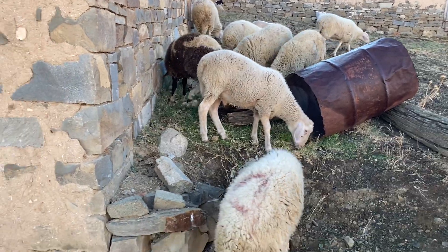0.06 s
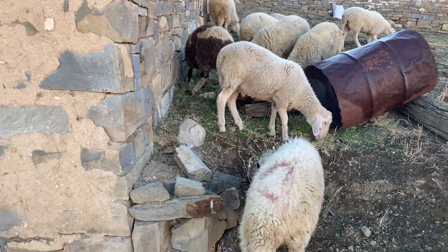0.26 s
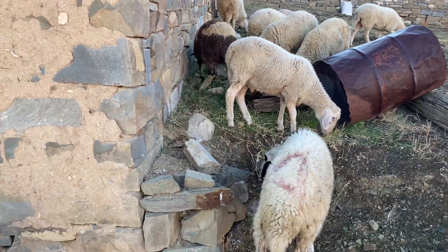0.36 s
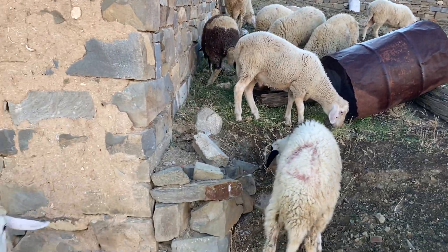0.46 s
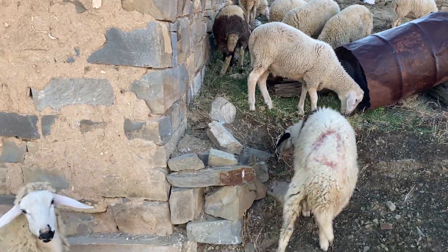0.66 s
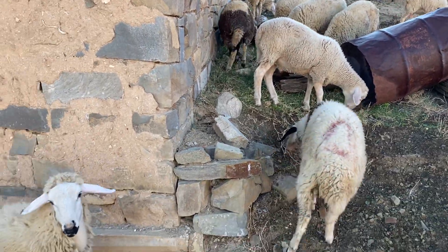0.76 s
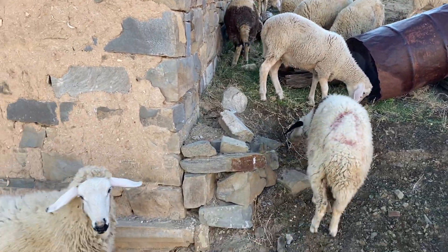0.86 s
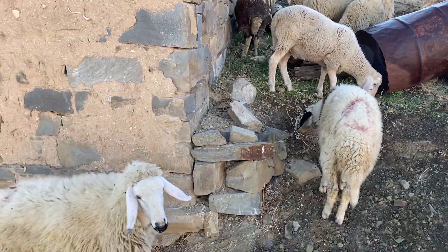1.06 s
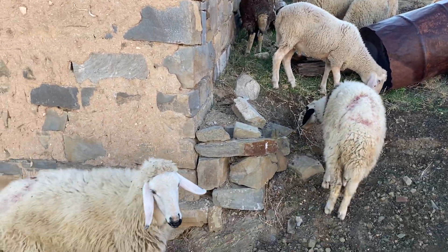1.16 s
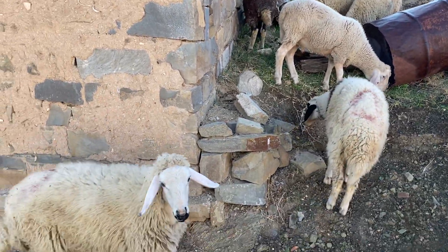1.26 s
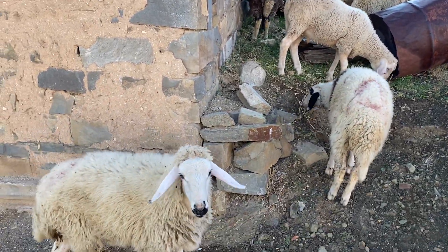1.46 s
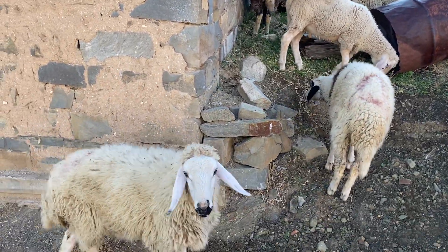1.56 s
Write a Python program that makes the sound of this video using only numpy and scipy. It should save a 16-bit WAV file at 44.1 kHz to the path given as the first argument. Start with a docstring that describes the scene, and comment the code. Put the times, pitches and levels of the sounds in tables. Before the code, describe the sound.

A small sheep bell clonks unevenly close by, with light hoof scuffs and faint wind.

```python
"""A small sheet-metal bell clonks unevenly on a sheep walking close by on the left.
Each clapper strike chokes the last hum and starts a new one, with bright rings on top.
Hooves tick and scuff on stony ground, dry grass crackles and a small metal link chinks.
Behind them light wind rumbles on the microphone, with one short buffet that flaps and crackles."""
import sys
import numpy as np
from scipy import signal
from scipy.fft import rfft, irfft
from scipy.io import wavfile
from scipy.ndimage import uniform_filter1d

SR = 44100
rng = np.random.default_rng(int(sys.argv[2]) if len(sys.argv) > 2 else 0)


def int16_out(signal):
    """Quantize to a 16-bit WAV file."""
    q = np.round(np.clip(np.atleast_2d(signal).T, -1, 1) * 32767)
    wavfile.write(sys.argv[1], SR, q.astype(np.int16))


N = 70560
T = np.arange(N) / SR
FREQS = np.fft.rfftfreq(N, 1 / SR) + 1e-3
LEFT_RIGHT = np.array([[.5], [-.5]])  # splits a level or phase offset between the sides


def undb(db):
    """Decibels to gain."""
    return 10 ** (np.asarray(db) / 20)


def unit(x):
    """Scale to rms 1."""
    return x / np.sqrt(np.mean(x ** 2) + 1e-24)


def fader(points):
    """Gain ride through (time [s], level [dB]) points."""
    return undb(np.interp(T, *np.array(points).T))


def colour(x, points):
    """EQ x through (frequency [Hz], gain [dB]) points, then scale to rms 1."""
    hz, db = np.array(points).T
    gain = undb(np.interp(np.log(FREQS), np.log(hz), db))
    return unit(irfft(rfft(x) * gain, N))


def noise(side_db):
    """Stereo white noise, mostly shared by both sides."""
    mid, side = rng.standard_normal((2, N))
    return mid + undb(side_db) * side * np.array([[1], [-1]])


def band(hz, width_hz):
    """Stereo noise in one steep-sided resonance."""
    detune = (FREQS - hz ** 2 / FREQS) / width_hz
    return unit(irfft(rfft(noise(side_db=-12)) / np.sqrt(1 + detune ** 4), N))


def steady(x, window_s):
    """Even out the chance swells of a low noise."""
    power = uniform_filter1d(np.mean(x ** 2, axis=0), max(int(window_s * SR), 8))
    return x / np.sqrt(power + 0.1)


def wander(rate_hz):
    """Glide between random values."""
    knots = rng.standard_normal(size=400)
    return np.interp(T * rate_hz, np.arange(len(knots)), knots)


def since(start):
    """Seconds since start, zero before it."""
    return np.maximum(T - start, 0)


def burst(start, decay_s, rise_s=.0002):
    """Near-instant attack and exponential release."""
    age = since(start)
    return (1 - np.exp(-age / rise_s)) * np.exp(-np.minimum(age / decay_s, 50))


def struck(modes, start, lag_ms, sustain=1, rise_s=.0021):
    """Decaying metal modes of alternating sign, so a close pair swells and beats; the right side lags."""
    live = (T > start) & (T < start + .6)
    age = np.maximum(T[live] - start - np.array([[0], [lag_ms / 1000]]), 0)
    out = np.zeros((2, N))
    for k, (hz, db, t60, pan_db) in enumerate(modes):
        gain = (-1) ** k * undb(db + LEFT_RIGHT * pan_db)
        tail = np.exp(-np.log(1000) * age / (t60 * sustain))
        out[:, live] += gain * np.sin(2 * np.pi * hz * age) * tail
    return out * (1 - np.exp(-since(start) / rise_s))


# Swell of the breeze (time [s], level [dB])
WIND_LEVEL = [(0, -53), (.17, -54), (.222, -44.5), (.25, -35), (.335, -29.5), (.355, -51), (.41, -48.5),
              (.458, -62), (.538, -51.5), (.6, -66), (1.05, -69.5), (1.6, -73.5)]
# Bass-heavy wind tone (frequency [Hz], gain [dB])
WIND_EQ = [(20, -30), (36, -14), (50, -15), (67, 0), (86, -2), (105, -7), (125, -16), (160, -24),
           (300, -47), (800, -78)]
def wind():
    """Air on the microphone: a low rumble that swells into one buffet."""
    rumble = colour(noise(side_db=-17), WIND_EQ)
    return steady(rumble, window_s=0.043) * fader(WIND_LEVEL)


# Flaps in the buffet (time [s], level [dB], start pitch [Hz], end pitch [Hz], length [s])
EDDY_FLAPS = [(0.119, -55, 145, 125, 0.059), (0.2, -51.5, 200, 172, 0.029), (0.237, -41, 190, 139, 0.036),
              (0.285, -34, 235, 155, 0.02), (0.314, -38, 329.3, 102, 0.0199)]
def eddies(skew_rad=0.56):
    """Short rounded flaps of air fall in pitch and reach the two sides a little out of step."""
    out = 0
    for start, db, start_hz, end_hz, length in EDDY_FLAPS:
        progress = np.clip((T - start) / length, 0, 1)
        pitch = start_hz + (end_hz - start_hz) * progress
        phase = 2 * np.pi * (np.cumsum(pitch) / SR + rng.random())
        swell = np.sin(np.pi * progress) ** 2
        out += undb(db) * np.sqrt(2) * swell * np.sin(phase + skew_rad * LEFT_RIGHT)
    return out


# Movement of the flock (time [s], level [dB])
SHUFFLE_LEVEL = [(0, -71.5), (.42, -65.5), (.55, -62.5), (.9, -63), (1.3, -67), (1.6, -75.5)]
# Dull shuffle tone (frequency [Hz], gain [dB])
SHUFFLE_EQ = [(60, 4.5), (130, 3), (230, 1), (360, -2.5), (520, -13), (1000, -19.5), (3000, -40)]
def flock_shuffle():
    """The moving flock lays down a soft, low bed of noise."""
    return colour(noise(side_db=-9), SHUFFLE_EQ) * fader(SHUFFLE_LEVEL)


# Rustle under the flock (time [s], level [dB])
GRASS_LEVEL = [(0, -72.5), (.056, -74), (.13, -73.5), (.175, -68), (.22, -76.5), (.265, -69), (.295, -65.5),
               (.44, -63), (.56, -66), (.68, -66.5), (.77, -62.5), (.82, -65.5), (.935, -60), (.965, -57.5),
               (1.05, -64), (1.1, -72), (1.26, -67), (1.31, -71), (1.39, -68.5), (1.47, -61), (1.53, -67),
               (1.6, -67)]
# Broad, dry grass tone (frequency [Hz], gain [dB])
GRASS_EQ = [(200, -5.5), (500, 5.5), (900, 3), (1600, 0), (3000, -2), (5500, -2.5), (7300, 0), (11500, 0),
            (16000, 0.5)]
def dry_grass(grains_per_s=590, spread_db=9.5, flicker_db=2.5):
    """Trodden grass gives a flickering hiss, peppered with fine crackle."""
    grains = (rng.random(N) < grains_per_s / SR) * rng.choice([-1, 1], N)
    accents = undb(spread_db * np.minimum(rng.exponential(size=N), 3))
    crackle = undb(-8.5) * unit(grains * accents)
    rustle = colour(noise(side_db=-13) + crackle, GRASS_EQ)
    return rustle * fader(GRASS_LEVEL) * undb(flicker_db * wander(rate_hz=69.58))


# Thin modes of the link (frequency [Hz], level [dB], t60 [s], left minus right [dB])
LINK_MODES = [(4748, 0, .14, 0), (7698, 1, .07, 0), (11640, -2, .07, 0)]
# Taps on the link (time [s], level [dB])
LINK_TAPS = [(1.249, -70), (1.2729, -63), (1.3585, -69.5)]
def metal_link():
    """A small piece of metal chinks faintly."""
    return sum(undb(db) * struck(LINK_MODES, start, lag_ms=0) for start, db in LINK_TAPS)


# Buffet crackle, then hoof hits (time [s], level [dB], centre [Hz], width [Hz], decay [s])
SHARP_TICKS = [(0.274, -49.5, 4800, 6400, .0011), (0.273, -49.5, 900, 1180, 0.0016),
               (0.2904, -57.5, 2000, 3600, 0.012), (0.315, -54.5, 2700, 5900, 0.003),
               (0.534, -53, 8350, 8800, 0.0013), (0.826, -60, 3830, 7060, 0.0044),
               (.862, -53, 2700, 4800, 0.0053), (0.9034, -53.5, 4760, 14200, 0.0026),
               (.9029, -55.5, 970, 1500, .0053), (.922, -52, 11100, 9000, .0012),
               (.9403, -55, 4860, 9100, 0.00063), (1.222, -54, 6000, 13500, 0.0048),
               (1.232, -48.5, 8700, 12000, 0.0014), (1.249, -53, 5450, 8400, .0019),
               (1.274, -54, 7750, 8000, 0.0023), (1.311, -62.5, 1970, 890, 0.0037),
               (1.332, -55.5, 1380, 1100, 0.0023), (1.344, -65, 1900, 700, .0025),
               (1.359, -66.5, 1600, 1400, 0.0043), (1.400, -63.5, 1840, 700, 0.0051),
               (1.412, -60, 885, 885, 0.0064), (1.433, -39, 10500, 8050, 0.002),
               (1.434, -52, 1220, 2600, 0.0027), (1.452, -39, 9500, 8000, 0.00059),
               (1.4517, -45, 1090, 2590, 0.0012), (1.566, -58.5, 6650, 6060, 0.0071),
               (1.583, -59, 4200, 2990, 0.0044), (1.591, -59.5, 5000, 6000, 0.0086)]
def sharp_ticks():
    """Sharp snaps of noise: crackle in the wind buffet, then hooves on grit and stalks."""
    return sum(undb(db) * burst(start, decay) * band(hz, width)
               for start, db, hz, width, decay in SHARP_TICKS)


# Buffet rasp, then hoof scuffs (time [s], level [dB], centre [Hz], width [Hz], length [s])
NOISE_PUFFS = [(.275, -58.5, 694, 940, 0.066), (.548, -62, 487, 200, 0.023), (1.105, -59, 218, 58, 0.036),
               (1.218, -63.5, 565, 200, 0.028), (1.44, -62, 260, 256, 0.024),
               (1.44, -63.5, 743, 307, 0.088)]
def noise_puffs():
    """Dull, rounded puffs: one rasp in the wind buffet, then hooves rubbing the earth."""
    out = 0
    for start, db, hz, width, length in NOISE_PUFFS:
        swell = np.sin(np.pi * np.clip((T - start) / length, 0, 1))
        out += undb(db) * steady(band(hz, width), window_s=0.018) * swell
    return out


# The bell's hollow hum, long ring and bright clink, each as modes
# (frequency [Hz], level [dB], t60 [s], left minus right [dB])
HUM_MODES = [(1159, 0, .14, -1.4), (1109, 0, .045, -1.4), (1560, -24, .1, 0), (6223, -44, .2, 3)]
RING_MODES = [(3090.5, 0, .35, 4), (6226, -16, .3, 3)]
CLINK_MODES = [(3370, -1, 0.24, 5.8), (3328, -4, 0.033, 2.1)]
# Clapper hits (time [s], hum [dB], ring [dB], clink [dB], sustain of hum and ring [x t60])
CLAPPER_HITS = [(-.045, -39, -52.5, -56, 1.25), (0.1434, -40.5, -64.5, -50.5, 0.9),
                (0.158, -44.5, -73.5, -98, 0.98), (.24, -62.5, -92, -82, 2.5),
                (0.4038, -32, -64.5, -48.5, 1.22), (0.4904, -43.5, -64.5, -90, 0.9),
                (0.5329, -37, -64, -73, 1.1), (0.551, -42, -85, -79, 1.26), (0.5838, -42, -90, -80, 0.92),
                (0.6648, -32, -98, -68.5, 1.18), (0.6813, -35, -95, -99, 0.99),
                (0.7714, -31.5, -75, -76, 1.44), (0.815, -39, -94, -71.5, 0.91),
                (.886, -55, -57.5, -56, 1.05), (0.9563, -37, -60, -79, 1.06), (1.0142, -36, -91, -90, 0.47),
                (1.4964, -38, -72, -69, 0.39)]
BELL_LAG_MS, CHOKE_S = 0.34, 0.0011  # delay to the right side; decay of the old hum at a new hit
PRESS_HZ = 44.8  # per unit of lost sustain: a clapper resting on the wall flattens the hum it damps
MUFFLE_AT_S, MUFFLE_DECAY_S = 1.024, .022  # the bell settles against the wool and its ringing dies
def sheep_bell():
    """Each clapper hit ticks, chokes the old hum and wakes hum, ring and clink by where it lands."""
    tone, contact = 0, 0
    next_hits = [hit[0] for hit in CLAPPER_HITS[1:]] + [np.inf]
    wool = np.exp(-since(MUFFLE_AT_S) / MUFFLE_DECAY_S)
    for (start, hum_db, ring_db, clink_db, sustain), next_hit in zip(CLAPPER_HITS, next_hits):
        flat_hz = PRESS_HZ * max(1 - sustain, 0)
        pressed_modes = [(hz - flat_hz, *rest) for hz, *rest in HUM_MODES]
        hum = undb(hum_db) * struck(pressed_modes, start, BELL_LAG_MS, sustain)
        ring = undb(ring_db) * struck(RING_MODES, start, BELL_LAG_MS, sustain)
        clink = undb(clink_db) * struck(CLINK_MODES, start, BELL_LAG_MS)
        choke = np.exp(-since(next_hit) / CHOKE_S)
        muffle = wool if start < MUFFLE_AT_S else 1
        tone += hum * choke + (ring + clink) * muffle
        tick_gain = undb(hum_db - 70) + undb(clink_db - 16.5)
        contact += tick_gain * burst(start, decay_s=0.022)
    return tone + contact * band(hz=1650, width_hz=1300)


def scene():
    """Bell, ticks and scuffs up front, over a bed of grass, flock and wind."""
    foreground = sheep_bell() + sharp_ticks() + noise_puffs() + metal_link()
    background = dry_grass() + flock_shuffle() + wind() + eddies()
    return foreground + background


def record(dry, spread_from_hz=6945, lag_ms=0.23, top_hz=15900):
    """The left channel lags the right in the high treble, widening it, and the top is cut."""
    phase = 2 * np.pi * np.maximum(FREQS - spread_from_hz, 0) * lag_ms / 1000
    widened = irfft(rfft(dry) * np.exp(-1j * phase * LEFT_RIGHT), N)
    high_cut = signal.ellip(10, .2, 70, top_hz, fs=SR, output="sos")
    return signal.sosfilt(high_cut, widened)


dry = scene()
out = record(dry)
int16_out(out)
```